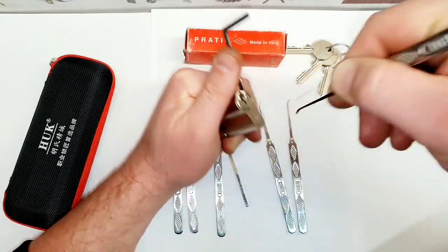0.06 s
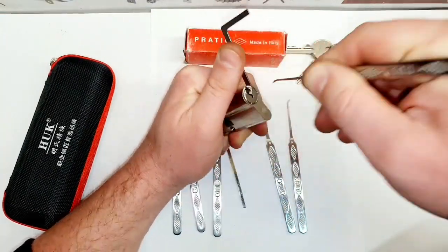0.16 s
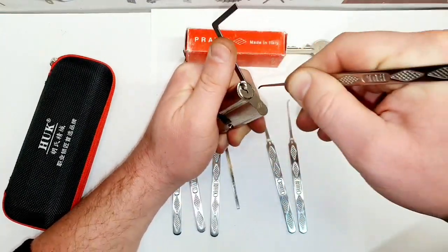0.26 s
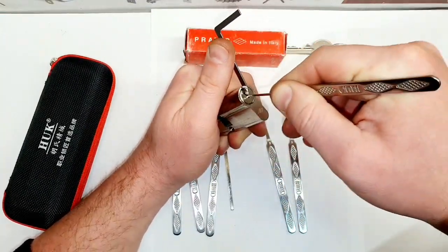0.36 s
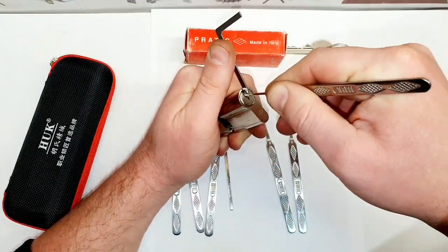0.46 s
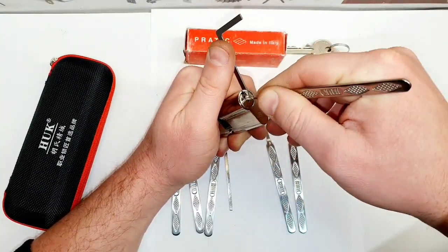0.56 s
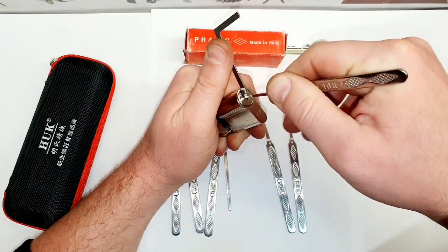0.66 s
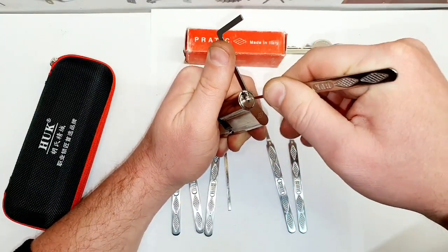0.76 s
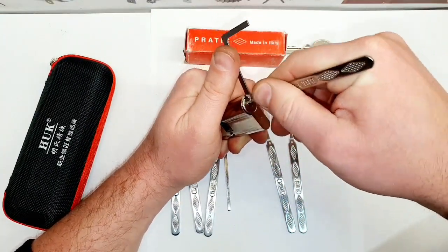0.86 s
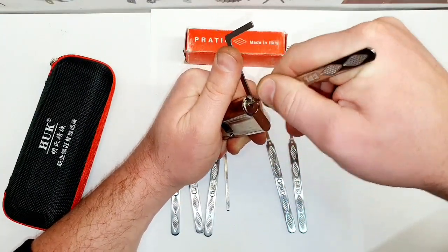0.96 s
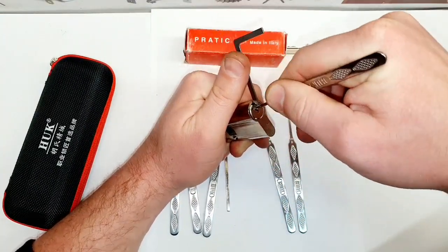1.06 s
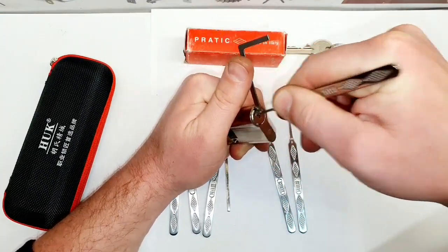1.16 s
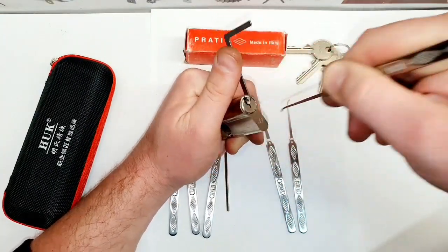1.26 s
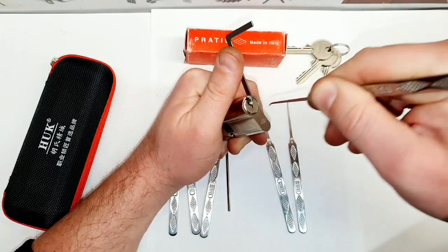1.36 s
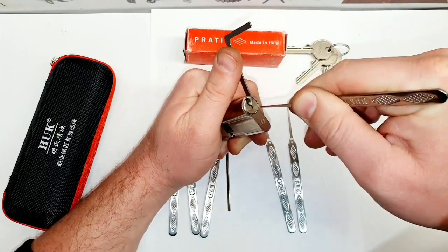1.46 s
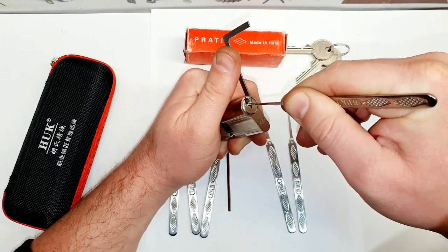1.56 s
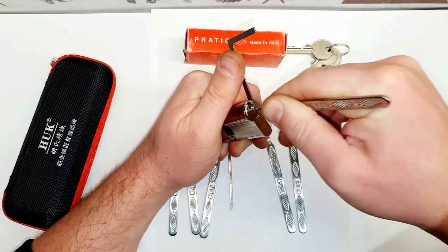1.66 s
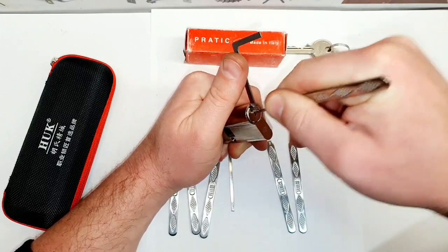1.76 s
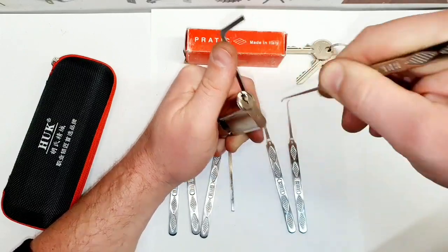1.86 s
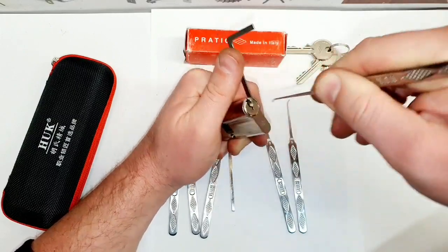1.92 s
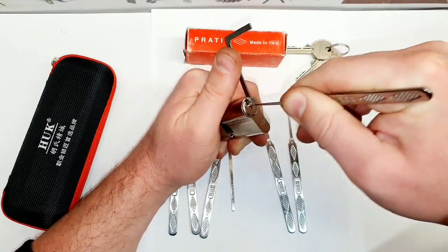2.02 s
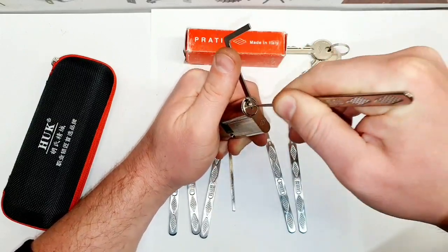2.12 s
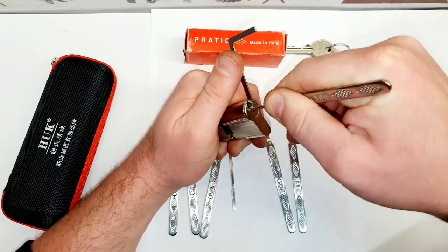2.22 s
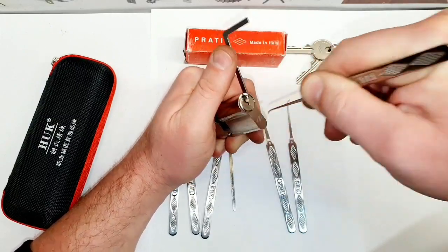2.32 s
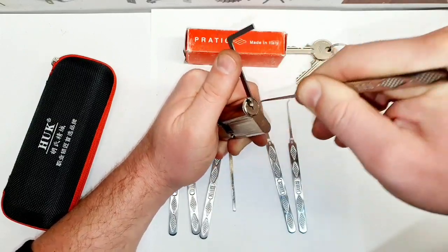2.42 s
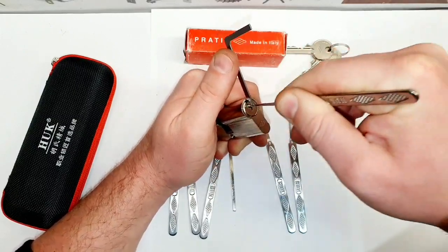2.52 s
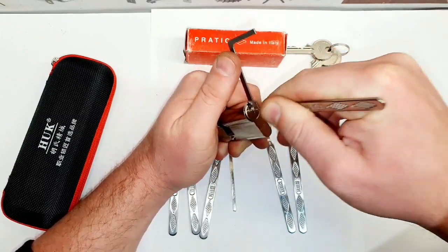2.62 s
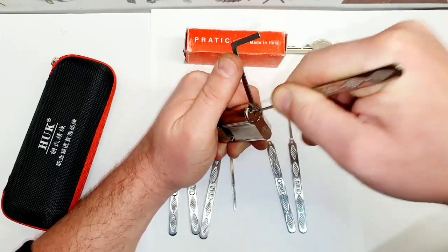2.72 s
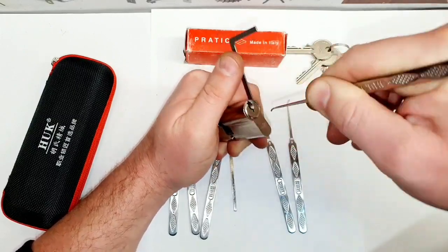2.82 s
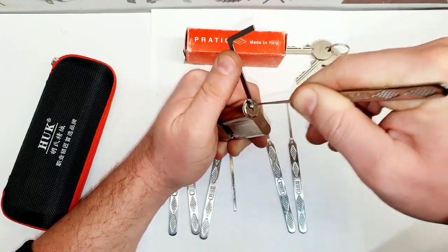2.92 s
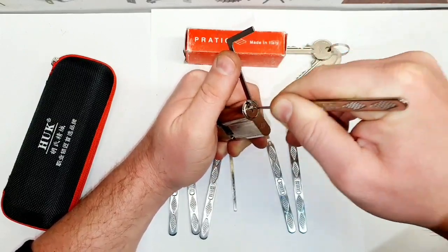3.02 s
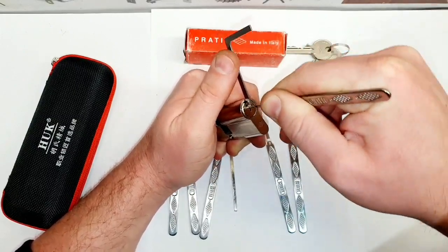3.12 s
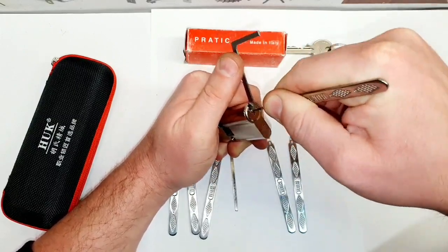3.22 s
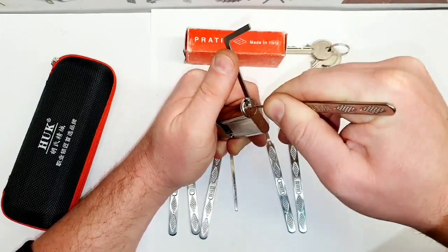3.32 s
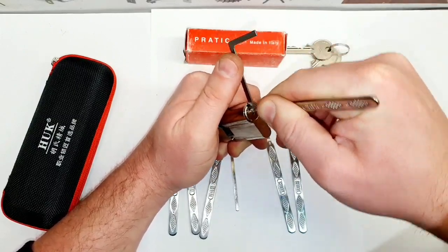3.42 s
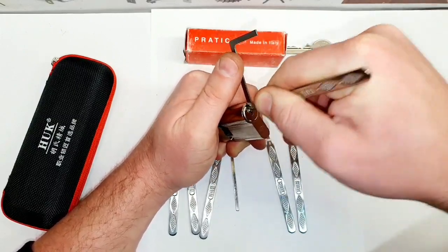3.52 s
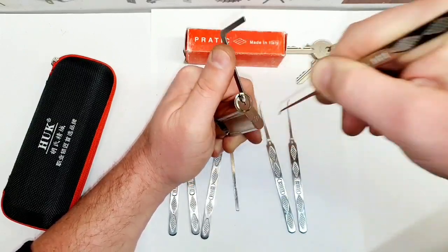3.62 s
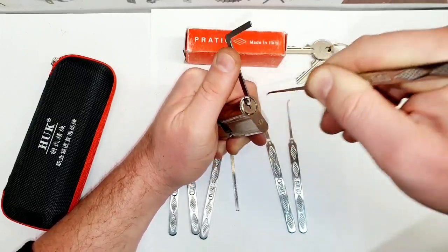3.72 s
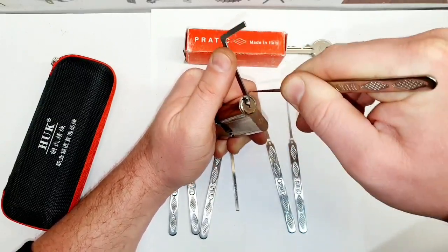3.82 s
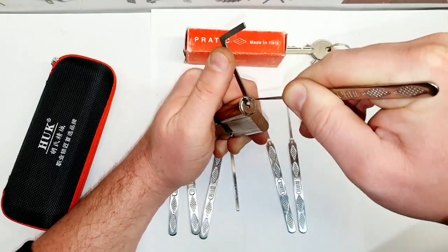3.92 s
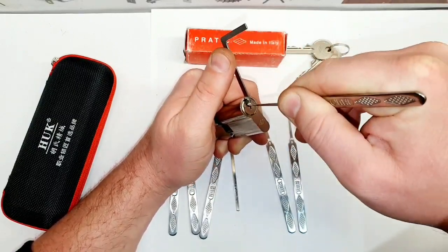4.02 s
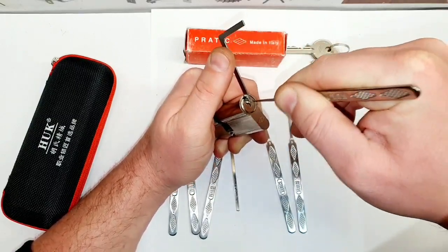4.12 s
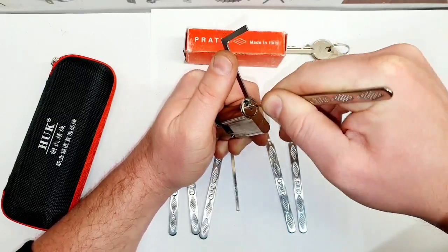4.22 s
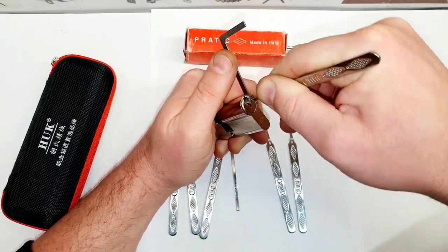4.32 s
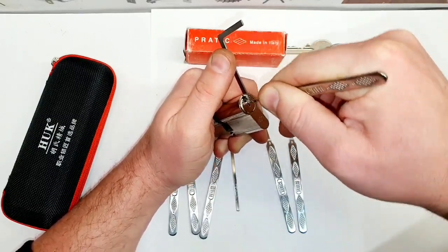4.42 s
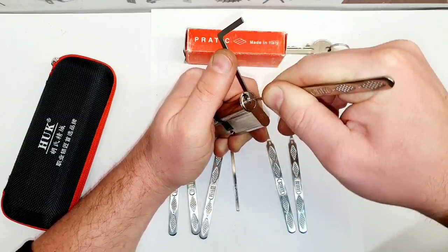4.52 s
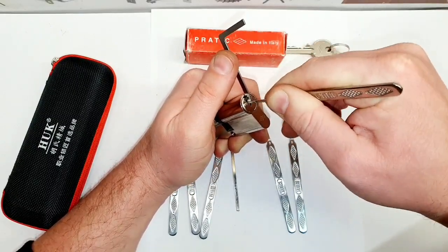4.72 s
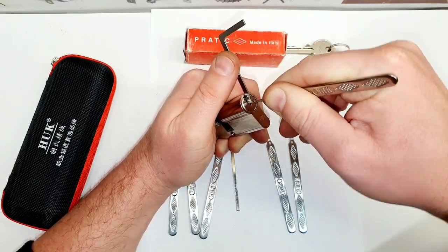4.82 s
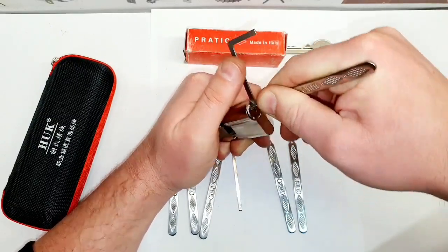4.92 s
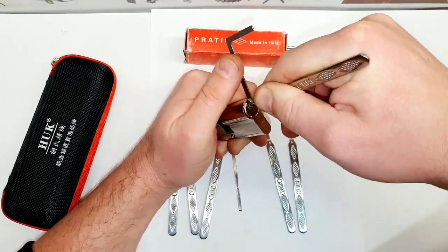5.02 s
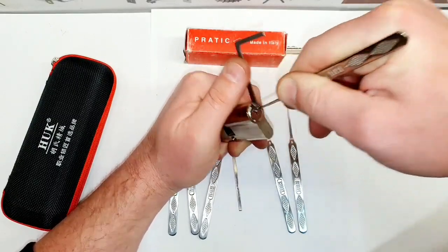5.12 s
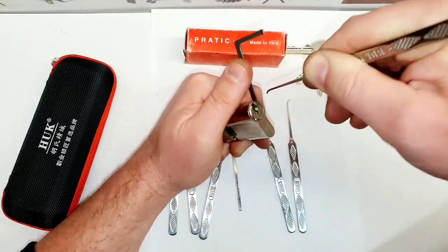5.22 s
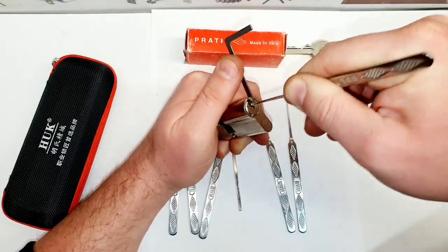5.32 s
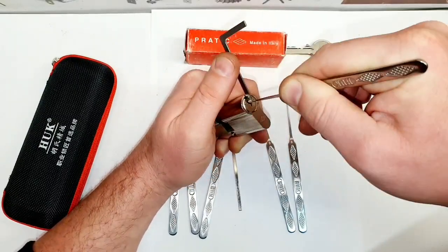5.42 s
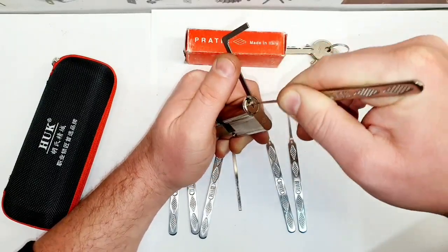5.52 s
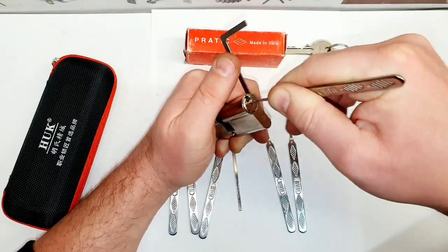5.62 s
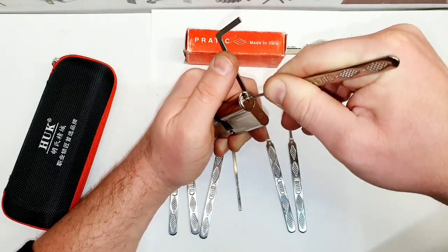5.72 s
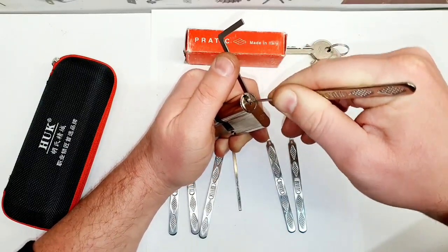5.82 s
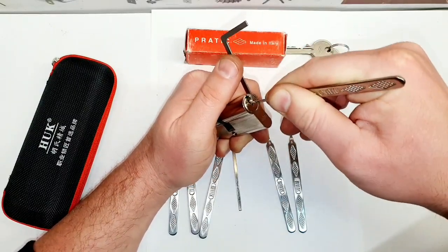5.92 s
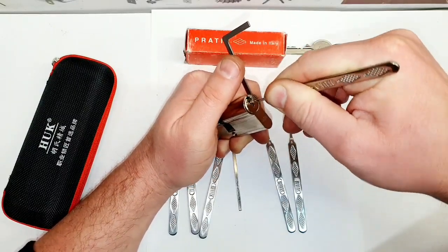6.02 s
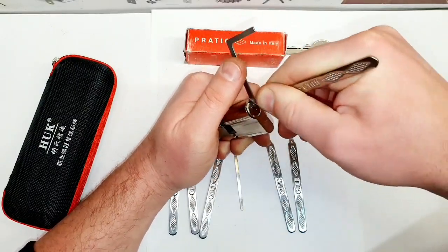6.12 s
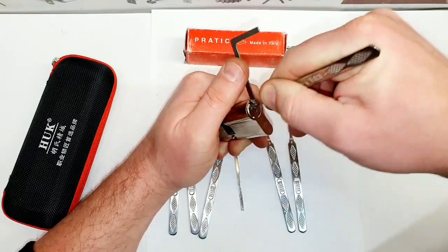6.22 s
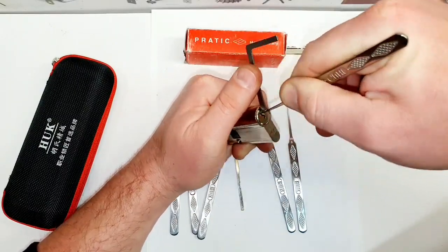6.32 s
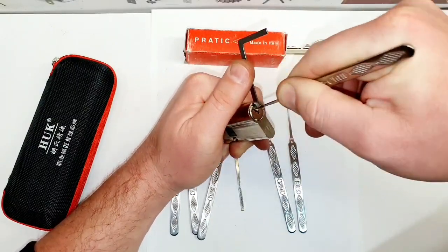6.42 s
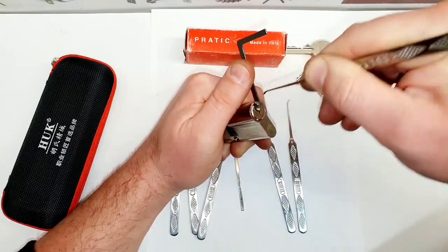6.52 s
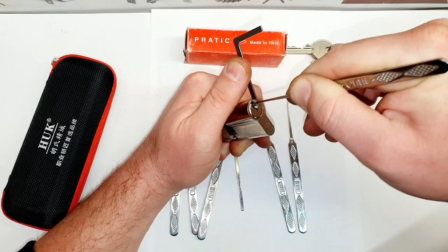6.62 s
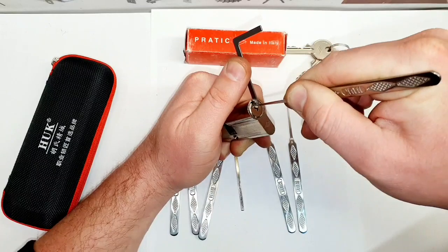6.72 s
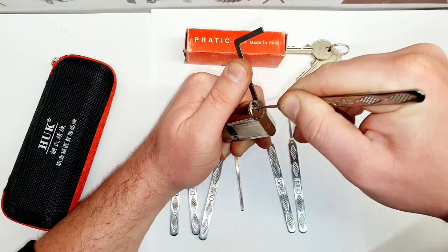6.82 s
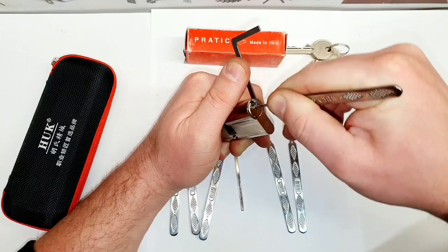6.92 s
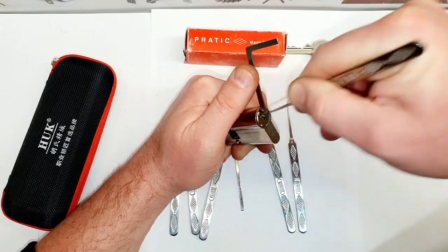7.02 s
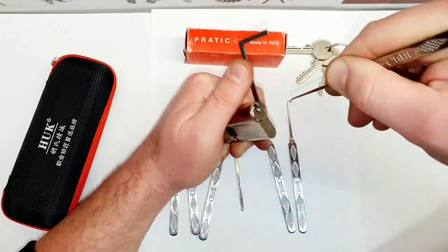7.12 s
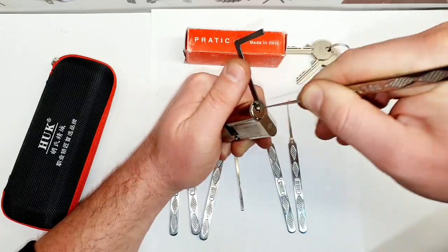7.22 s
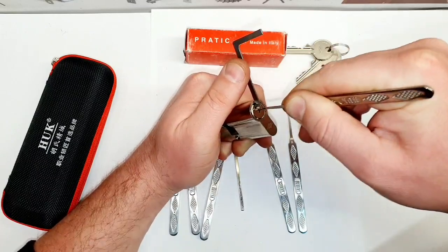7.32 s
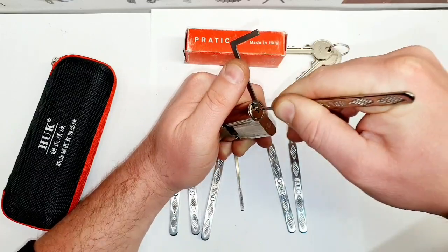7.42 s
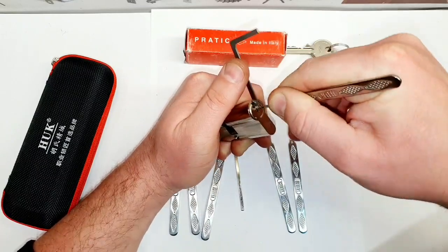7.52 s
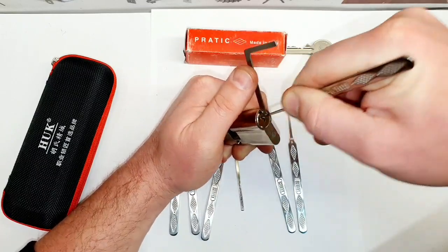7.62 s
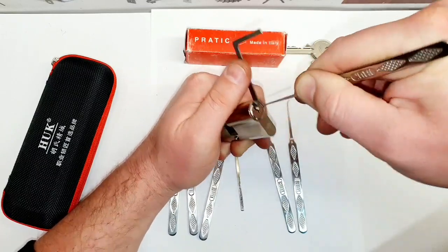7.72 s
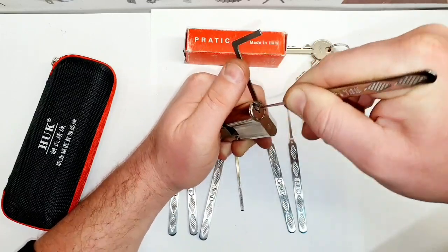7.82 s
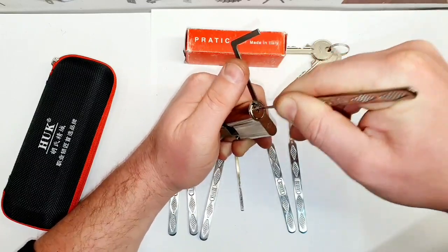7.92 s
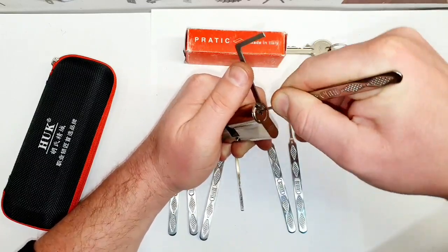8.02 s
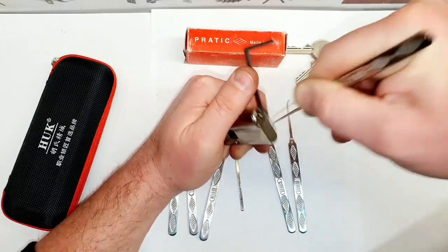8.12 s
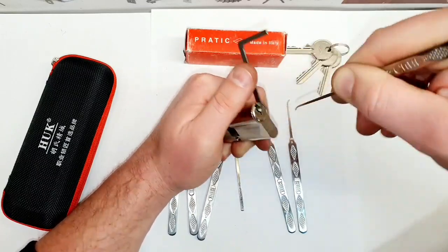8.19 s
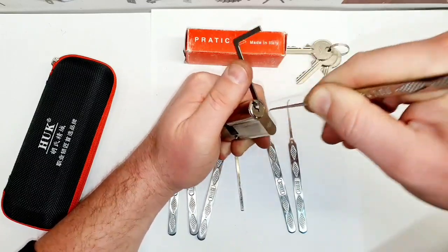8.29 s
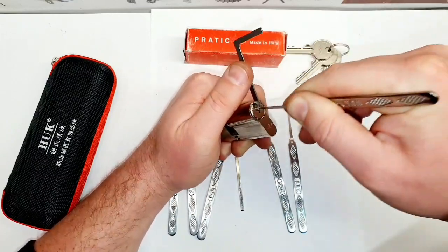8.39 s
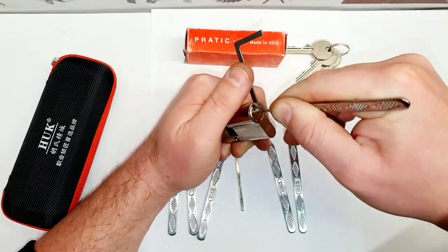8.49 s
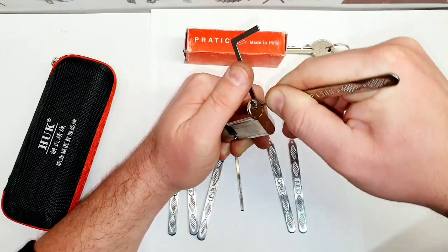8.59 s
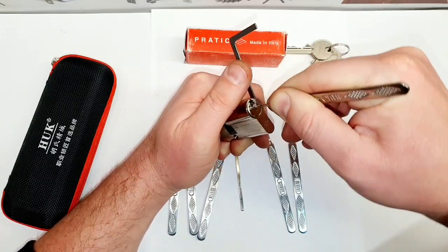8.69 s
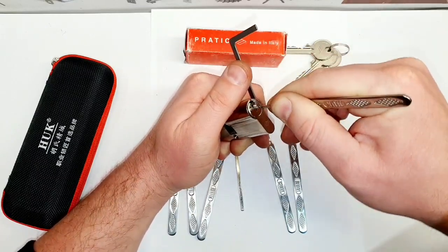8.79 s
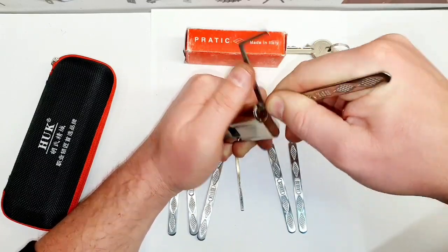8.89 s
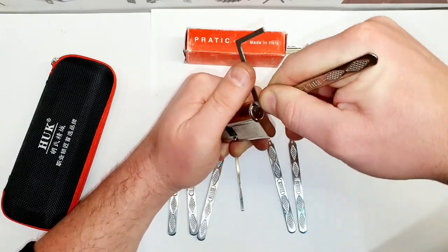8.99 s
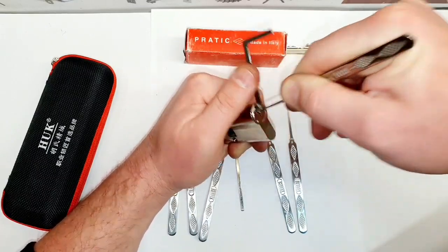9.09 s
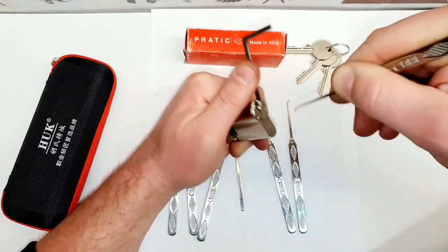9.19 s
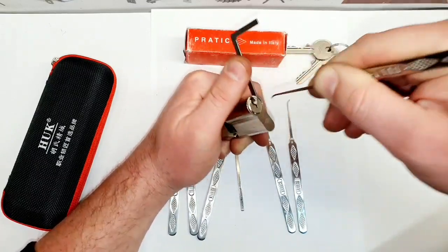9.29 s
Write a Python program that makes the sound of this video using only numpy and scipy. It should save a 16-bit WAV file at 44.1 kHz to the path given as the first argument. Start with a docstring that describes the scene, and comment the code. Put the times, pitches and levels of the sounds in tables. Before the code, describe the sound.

A steel tip feels along pins inside a small lock and snaps off them again and again. Loud bright ticks come every half second to a second, separated by faint scratches. The busy start gives way to a quieter middle, then stronger clicks and heavier knocks after five seconds. Close microphone, quiet room, low rumble swelling with each pull, steady faint hiss.

```python
"""A steel pick works the pins of a small hand-held cylinder lock, close to the microphone in a quiet, rumbling room.
Again and again the tip feels along the pins (trains of tiny slips) and snaps off them in clicks (impact noise through
steel resonances, with body modes of the lock). It is then drawn out over them: the hum and low noise swell as the hand
pulls, and fade just after the pick comes free with a twang on one damped note. A dull knock or hollow ring (decaying
noise through broad resonances) often follows. At moments fingers rub the lock (low noise); hum and hiss last throughout."""
import sys
import numpy as np
from scipy import signal
from scipy.fft import rfft, irfft
from scipy.io import wavfile
from scipy.ndimage import uniform_filter1d

SR = 44100
rng = np.random.default_rng(int(sys.argv[2]) if len(sys.argv) > 2 else 0)


def int16_out(signal):
    """Quantize to a 16-bit WAV file."""
    q = np.round(np.clip(np.atleast_2d(signal).T, -1, 1) * 32767)
    wavfile.write(sys.argv[1], SR, q.astype(np.int16))


N = 412335
TIME = np.arange(N) / SR  # seconds

# The tip snaps off a pin: start_s, level_db (at 3-8 kHz), top_octave_db (relative to that level)
PIN_SNAPS = [(0.0161, -39.5, -7), (0.0516, -37, 2), (0.066, -32, 3), (0.898, -49, -3), (0.9804, -64, 8),
             (1.0337, -37, 7.5), (1.2489, -32.5, 4), (1.2786, -35.5, 6.5), (1.284, -34, 3.5),
             (1.576, -49, 3.5), (1.7227, -48.5, -3), (1.8296, -40, 5.5), (1.8409, -40.5, 5),
             (1.8751, -29, 2), (1.9538, -41.5, -2), (2.3184, -53, 3.5), (2.376, -35.5, 1.5),
             (2.4474, -44, -3.5), (2.532, -47.5, -10), (2.6714, -47, -7), (2.707, -49, -3.5),
             (2.783, -37.5, 1.5), (2.794, -35.5, -6), (2.8082, -42, 5), (2.8226, -27, 2.5),
             (2.8926, -41.5, 0.5), (3.35, -49, 4.5), (3.5193, -42.5, -0.5), (3.6186, -37.5, 3),
             (3.658, -36.5, 2), (3.722, -39.5, -4.5), (3.8621, -45.5, -12), (3.9211, -55.5, 0),
             (4.1771, -48.5, -2), (4.3009, -56, -12.5), (4.455, -64, -6), (4.791, -60, -5.5),
             (4.959, -42.5, 8), (4.9682, -39.5, -1.5), (5.146, -44.5, 2), (5.1604, -43, 0),
             (5.171, -41.5, 3), (5.1947, -34.5, 2.5), (5.2108, -30, -2.5), (5.2299, -37, -2.5),
             (5.2862, -39, -4.5), (5.56, -47.5, 1.5), (5.6333, -48.5, -3), (5.6693, -49, -5),
             (5.692, -45, -8), (5.8296, -59.5, 0.5), (6.131, -52, 9.5), (6.1465, -34, 1.5),
             (6.3118, -45, 1.5), (6.3268, -36.5, -2.5), (6.3394, -38.5, -2), (6.3668, -26, 2),
             (6.508, -44, 5), (7.039, -51, 1), (7.0671, -29, 0), (7.1057, -25.5, -3.5), (7.118, -30, 3),
             (7.2026, -40, -5), (7.596, -55.5, 3), (7.6469, -36, 8.5), (7.6624, -34.5, 0),
             (7.692, -28, 0.5), (7.7274, -31.5, -1.5), (8.0154, -46, -4.5), (8.1274, -31.5, 0.5),
             (8.1422, -39, 4), (8.1768, -23.5, -5), (8.192, -26, -3.5), (8.1963, -24, -1),
             (8.2817, -37, -10), (8.4206, -47, -6), (8.568, -53, -2), (8.9659, -34, -1.5), (9.0694, -38, 1),
             (9.1155, -38.5, -3), (9.1387, -27.5, 8), (9.1725, -25, 2)]
# The pick is drawn out: free_s (moment it comes free), drag_length_s, drag_db, twang_db, low_swell_db
PULLS = [(0.08, 0.026, -47.5, -35.5, -48), (1.3009, 0.025, -42, -28, -38), (1.875, 0.04, -37, -24.5, -47.5),
         (2.377, 0.021, -45, -32, -42), (2.822, 0.031, -43, -24, -57), (3.665, 0.045, -37, -27, -40.5),
         (5.2116, 0.07, -48, -21.5, -40), (6.368, 0.063, -50.5, -48.5, -40.5), (7.126, 0.05, -46, -29, -52),
         (7.735, 0.093, -60, -35, -41), (8.2, 0.03, -45.5, -28, -40), (9.175, 0.071, -44.5, -21.5, -44)]
# The tip feels its way along the pins: start_s, length_s, level_db
PROBES = [(0.13, 0.095, -70), (0.44, 0.093, -64.5), (0.85, 0.25, -62.5), (1.38, 0.01, -57.5),
          (1.505, 0.19, -57), (2.06, 0.24, -65), (2.33, 0.17, -59), (2.58, 0.3, -63), (3.0, 0.12, -62),
          (3.22, 0.097, -63), (3.38, 0.15, -64.5), (3.8, 0.15, -61), (3.97, 0.092, -70.5),
          (5.29, 0.11, -67.5), (5.6, 0.082, -60.5), (5.96, 0.099, -67.5), (6.96, 0.02, -49.5),
          (7.16, 0.058, -47.5), (7.35, 0.17, -69.5), (7.81, 0.28, -66), (8.42, 0.12, -67.5),
          (9.22, 0.11, -53.5)]
# Dull knocks: start_s, level_db
KNOCKS = [(0.08, -33), (0.122, -49), (1.912, -31.5), (3.7212, -45), (5.252, -23), (8.2293, -24),
          (9.2043, -25.5)]
# The lock is jerked against the fingers: start_s, level_db
THUDS = [(1.246, -40), (1.844, -45.5), (3.619, -39.5), (4.954, -49), (6.368, -43), (7.068, -41.5),
         (7.108, -39), (7.661, -38), (8.131, -40.5), (8.18, -41)]
# Hollow rings as the parts settle: start_s, level_db
SETTLES = [(0.08, -42), (1.958, -41.5), (2.902, -48.5), (3.736, -42.5), (5.290, -38.5), (5.384, -60),
           (5.85, -65), (6.400, -50), (7.186, -43), (7.206, -39.5), (8.264, -42.5), (8.288, -43.5),
           (9.288, -43.5)]
# The flat of the pick brushes the keyway: start_s, level_db
KEYWAY_RUBS = [(0.522, -75.5), (0.646, -73), (0.861, -62), (1.383, -62), (2.458, -53), (3.134, -63),
               (3.811, -57), (3.91, -54.5), (4.455, -66.5), (5.83, -57.5), (5.966, -61.5), (6.386, -50),
               (6.98, -56)]
# The gripping fingers shift on the lock: start_s, length_s, level_db
GRIP_SHIFTS = [(0.26, 0.075, -54.5), (1.02, 0.1, -54), (3.0, 0.148, -46), (3.14, 0.13, -64)]
# Level of the low rumble over time: time_s, level_db
RUMBLE_LEVEL = [(0, -40.5), (0.3, -50.5), (0.9, -52.5), (1.6, -48), (2.1, -49.5), (3.04, -48.5),
                (3.13, -38), (3.25, -40), (3.37, -47.5), (4.7, -55.5), (5.7, -51.5), (6.7, -56.5),
                (7.15, -49), (7.55, -60), (8.3, -47.5), (8.9, -53), (9.35, -48.5)]

# Resonances of the hand-held lock: pitch_hz, level_db, t60_s
BODY_MODES = [(165, -16, 0.019), (243.3, -5.5, 0.069), (516, -8.5, 0.055), (714, -19.5, 0.05),
              (1480, -15.5, 0.01), (1605, -7.5, 0.051), (2540, -17, 0.056)]
# Spectrum of the ringing steel: frequency_hz, density_db (per Hz, relative)
STEEL_SPECTRUM = [(150, -33.5), (400, -2), (750, -8), (1300, -3.5), (2000, -1), (2800, -2), (3500, 1.5),
                  (4300, 3.5), (5800, 0.5), (7000, -0.5), (8600, -8.5), (10000, -3.5), (12200, -0.5),
                  (15600, -4)]
# Spectrum of the scraping tip: frequency_hz, density_db (per Hz, relative)
FRICTION_SPECTRUM = [(400, -0.5), (700, -7.5), (1000, -6.5), (2000, -5), (3600, -6), (5000, -6),
                     (6800, -5.5), (8500, -17), (12500, -9), (16000, -9.5)]
# Spectrum of a dull knock: frequency_hz, density_db (per Hz, relative)
KNOCK_SPECTRUM = [(120, -16.5), (240, -1.5), (350, 1), (520, 2.5), (700, -6), (1350, 4.5), (2200, -4.5),
                  (3700, -11), (6000, -12), (9000, -41), (13000, -23), (16000, -49.5)]
# Hollow resonances of the settling parts: frequency_hz, density_db (per Hz, relative)
HOLLOW_SPECTRUM = [(300, -13), (520, -8), (680, -11.5), (820, 9), (930, 4), (1100, -14.5), (2250, -9),
                   (2650, 1.5), (3000, -8.5), (5000, -19.5), (16000, -30)]
# Spectrum of fingers rubbing the lock: frequency_hz, density_db (per Hz, relative)
SKIN_SPECTRUM = [(40, 6.5), (180, 3.5), (320, -6), (480, -14.5), (1500, -47.5)]
# Spectrum of the low room noise: frequency_hz, density_db (per Hz, relative)
RUMBLE_SPECTRUM = [(20, -23), (50, -10.5), (62, -0.5), (68, 1.5), (78, -7.5), (110, -14), (145, -23.5),
                   (195, -17), (330, -33), (2000, -74.5)]
# Spectrum of the steady hiss: frequency_hz, density_db (per Hz, relative)
HISS_SPECTRUM = [(100, -0.5), (500, 0), (900, -11.5), (1700, -2.5), (3000, -18), (6500, -21.5), (8500, -26),
                 (13000, -19), (16000, -24)]
# Reverberation time of the room: frequency_hz, t60_s
ROOM_T60 = [(200, 0.83), (1000, 0.32), (4000, 0.28), (9000, 0.12), (16000, 0.53)]

# Shares in a click of middling level, and their change per dB of level: faint clicks are duller and start more softly
MIDDLING_DB = -43
BODY_SHARE_DB, BODY_SHARE_SLOPE = -8.5, -0.32
LEAD_IN_SHARE_DB, LEAD_IN_SHARE_SLOPE, LEAD_IN_S = -10, -0.57, 0.0012
# Friction: slips per second, decay of each slip, level of the tip lying in the keyway
SLIPS_PER_S, SLIP_S, RESTING_DB = 90, 0.0035, -82
# Rates of rise and fall of each stroke, in dB per second
PROBE_RISE_DB_PER_S, PROBE_FALL_DB_PER_S = 891.5, 351
DRAG_RISE_DB_PER_S, DRAG_FALL_DB_PER_S = 1100, 518.5
SWELL_RISE_DB_PER_S, SWELL_FALL_DB_PER_S = 250, 250
GRIP_RISE_DB_PER_S, GRIP_FALL_DB_PER_S = 1500.5, 700
HISS_DB = -77.5
CUTOFF_HZ = 16000


def pin_clicks(patchy_db=2.5, count=44, size=1024):
    """Impact excitation: a very short noise swell leads into each click of varied steel colour; the lock jolts."""
    out = np.zeros((2, N))
    hz = np.fft.rfftfreq(size, 1 / SR)
    top = np.interp(hz, [7000, 9500], [0, 1])
    low = np.interp(hz, [1900, 3300], [1, 0])
    patch_hz = np.geomspace(400, 16000, count)
    lead = size // 2
    swell = np.exp(-TIME[:lead] / LEAD_IN_S)[::-1]
    for s, db, top_db in PIN_SNAPS:
        strength_db = db - MIDDLING_DB
        body_tilt_db = BODY_SHARE_SLOPE * strength_db
        lead_in_db = LEAD_IN_SHARE_DB + LEAD_IN_SHARE_SLOPE * strength_db
        # each snap has its own random peaks and dips
        patches = np.interp(hz, patch_hz, rng.standard_normal(count))
        steel_db = at_hz(STEEL_SPECTRUM, hz) + top * top_db + low * body_tilt_db + patchy_db * patches
        burst = contact(crack_db=-10.5, rattle_db=-6.0, rattle_s=0.00031, ring_s=0.0049, side_db=0.0,
                        table_db=-16.5)
        lead_in = from_db(lead_in_db) * swell * rng.standard_normal((2, lead))
        click = convolve(np.hstack([lead_in, burst]), response(steel_db))
        add(out, s - lead / SR, from_db(db + 6.5) * click)
        jolt = struck(BODY_MODES, spread_db=2.5, detune=0.0092)
        add(out, s, from_db(db + BODY_SHARE_DB + body_tilt_db + 8.0) * jolt)
    return out


def contact(crack_db, rattle_db, rattle_s, ring_s, side_db, table_db, table_s=0.0047, size=2200):
    """Impact and reflection: a hard crack, a short rattle and a dense metal ring, echoed by the table."""
    t = TIME[:size]
    decay = from_db(rattle_db) * np.exp(-t / rattle_s) + np.exp(-t / ring_s)
    burst = unit_energy(decay * two_ears(size, side_db))
    # the crack reaches the right microphone one sample before the left
    burst[[0, 1], [1, 0]] += from_db(crack_db) * rng.choice([-1, 1])
    lag = int(table_s * SR * rng.uniform(.9, 0.91))
    echo = np.pad(burst, [(0, 0), (lag, 0)])[:, :size]
    burst = burst + from_db(table_db) * echo
    return unit_energy(burst) * np.sqrt(SR / 200)  # the energy of 5 ms at rms 1


def struck(modes, spread_db, detune, size=6000):
    """Modal synthesis: one blow sums damped sines, each with random strength and slight mistuning."""
    hz, db, t60 = np.transpose(modes)[:, :, None]
    t = TIME[:size]
    strength, shift = rng.standard_normal((2, len(modes), 1))
    decay = from_db(db + spread_db * strength - 60 * t / t60)
    return np.sum(decay * np.sin(2 * np.pi * hz * (1 + detune * shift) * t), axis=0)


def scraping(spread_db=4.0, smooth_db=-12.0, patchy_db=2.5, focus_db_per_octave=9.0, centre_hz=5200,
             centre_octaves=0.9, count=15):
    """Stick-slip friction: random tiny slips, each briefly exciting bands round its own centre, over smooth noise."""
    at = np.flatnonzero(rng.random(N) < SLIPS_PER_S / SR)
    sizes_db = spread_db * np.minimum(rng.exponential(1, len(at)), 2)
    centres = np.log2(centre_hz) + centre_octaves * rng.standard_normal(len(at))
    white = rng.standard_normal((2, 2, N))  # neighbouring bands get unrelated noise
    slip_decay = np.exp(-1 / (SLIP_S * SR))
    grain, edges = 0, np.geomspace(500, 17000, count)
    for k, (low, high) in enumerate(zip(edges, edges[1:])):
        off_centre = np.minimum(np.abs(np.log2(low * high) / 2 - centres), 2)  # octaves
        patches_db = patchy_db * rng.uniform(-1.6, 1.6, len(at))
        slips = np.zeros(N)
        slips[at] = from_db(sizes_db - focus_db_per_octave * off_centre + patches_db)
        activity = signal.lfilter([1], [1, -slip_decay], slips + 1e-18)
        level = rms_one(activity) + from_db(smooth_db)
        grain = grain + cut(level * white[k % 2], [low, high], "band")
    return colour(rms_one(grain) * pressure(), FRICTION_SPECTRUM)


def pressure():
    """Friction grows with contact force: its gain follows the resting, probing and drawn-out tip."""
    probing = strokes(PROBES, PROBE_RISE_DB_PER_S, PROBE_FALL_DB_PER_S)
    drags = [(s - length, length, db) for s, length, db, _, _ in PULLS]
    dragging = strokes(drags, DRAG_RISE_DB_PER_S, DRAG_FALL_DB_PER_S)
    return from_db(RESTING_DB) + probing + dragging


def twangs(pitch_hz=1578, hold_s=0.011, thump_db=-18.0, thump_hz=66, thump_s=0.057, size=6000):
    """Damped free vibration: the shank rings on one note until the fingers choke it, with a soft low thump."""
    out, t = np.zeros((2, N)), TIME[:size]
    note = np.exp(-(t / hold_s) ** 2) * np.sin(2 * np.pi * pitch_hz * t)
    thump = from_db(thump_db) * np.exp(-t / thump_s) * np.sin(2 * np.pi * thump_hz * t)
    for s, _, _, db, _ in PULLS:
        add(out, s, from_db(db) * (note + thump))
    return out


def knocks(body_db=-10.5):
    """Soft impact: a heavier contact excites little treble and shakes the modes of the whole lock."""
    out, body = np.zeros((2, 2, N))
    for s, db in KNOCKS:
        blow = contact(crack_db=-18.0, rattle_db=9.0, rattle_s=0.00054, ring_s=0.012, side_db=-5.5,
                       table_db=-17.0)
        add(out, s, from_db(db) * blow)
        add(body, s, from_db(db + body_db) * struck(BODY_MODES, spread_db=2.5, detune=0))
    return colour(out, KNOCK_SPECTRUM) + body


def thuds(pitch_hz=240, rise_s=0.002, fall_s=0.012, detune=0.095, size=5000):
    """Mass on a lossy spring: the lock bounces on the flesh of the hand for a few damped low cycles."""
    out, t = np.zeros((2, N)), TIME[:size]
    envelope = np.exp(-t / fall_s) - np.exp(-t / rise_s)
    for (s, db), shift in zip(THUDS, rng.standard_normal(len(THUDS))):
        bounce = np.sin(2 * np.pi * pitch_hz * (1 + detune * shift) * t)
        add(out, s, from_db(db + 9.5) * envelope * bounce)
    return out


def settles(rattle_s=0.014, rise_s=0.0013, size=5000):
    """Resonant filtering: a brief noisy rattle sounds through hollow resonances near 850 and 2650 Hz."""
    out, t = np.zeros((2, N)), TIME[:size]
    envelope = np.exp(-t / rattle_s) - np.exp(-t / rise_s)
    for s, db in SETTLES:
        add(out, s, from_db(db + 3.5) * envelope * two_ears(size, side_db=-2.0))
    return colour(out, HOLLOW_SPECTRUM)


def hollow_tail(x, tail_db=-22.5, tail_s=0.033, rise_s=0.0068, size=12000):
    """Resonance by convolution: every contact leaves a faint lingering ring in the same hollow resonances."""
    t = TIME[:size]
    envelope = np.exp(-t / tail_s) - np.exp(-t / rise_s)
    ring = unit_energy(envelope * two_ears(size, side_db=-1.5))
    return from_db(tail_db) * colour(convolve(x, ring), HOLLOW_SPECTRUM)


def rubs(length_s=0.0157, band_hz=(2500, 4300), size=8000):
    """Sliding friction: the flat of the pick brushes the keyway in a short swell of band-limited noise."""
    out, t = np.zeros((2, N)), TIME[:size]
    swell = t / length_s * np.exp(1 - t / length_s)  # peaks at length_s
    for s, db in KEYWAY_RUBS:
        add(out, s, from_db(db + 8.5) * swell * rng.standard_normal((2, size)))
    return cut(out, band_hz, "band")


def grip():
    """Skin friction: fingers shifting on the lock body make strokes of low noise."""
    level = strokes(GRIP_SHIFTS, GRIP_RISE_DB_PER_S, GRIP_FALL_DB_PER_S)
    return level * stereo_noise(SKIN_SPECTRUM, side_db=-13.5)


def room(x, early_db=14.0, early_s=0.012, gap_s=0.0035, size=26000, count=9):
    """Reverberation: dense early reflections lead to a diffuse tail that decays band by band."""
    t, tail = TIME[:size], 0
    edges = np.geomspace(120, 17000, count)
    for low, high in zip(edges, edges[1:]):
        band = cut(rng.standard_normal((2, size)), [low, high], "band")
        t60 = at_hz(ROOM_T60, np.sqrt(low * high))
        tail = tail + band * from_db(-60 * t / t60)
    early = 1 + from_db(early_db) * np.exp(-t / early_s)
    onset = np.clip(t / gap_s - 1, 0, 1)  # silent for gap_s, then fades in over as long again
    return convolve(x, unit_energy(cut(tail * early * onset, 4600, "low", order=1)))


def rumble(hum_hz=68, hum_db=0.0, swell_s=0.033, lag_s=0.008, size=5000):
    """Amplitude modulation: hum and low noise swell as the hand pulls, and fade just after the pick comes free."""
    hum = from_db(hum_db) * np.sin(2 * np.pi * hum_hz * TIME)
    lows = stereo_noise(RUMBLE_SPECTRUM, side_db=-9.5) + hum
    # even out the level before shaping it
    evened = lows / np.sqrt(uniform_filter1d(np.mean(lows ** 2, axis=0), size))
    swells = [(s + lag_s - swell_s, swell_s, db) for s, *_, db in PULLS]
    swell = strokes(swells, SWELL_RISE_DB_PER_S, SWELL_FALL_DB_PER_S)
    return np.hypot(level_curve(RUMBLE_LEVEL), swell) * evened


def hiss():
    """Stationary noise: a faint coloured hiss of constant level."""
    return from_db(HISS_DB) * stereo_noise(HISS_SPECTRUM, side_db=-1.0)


def stereo_noise(spectrum, side_db):
    """Spectral shaping: coloured stereo noise at rms 1."""
    return rms_one(colour(two_ears(N, side_db), spectrum))


def two_ears(size, side_db):
    """Partial coherence: mid and side white noise make channels partly alike, at rms 1."""
    mid, side = rng.standard_normal((2, size))
    return rms_one(mid + from_db(side_db) * side * [[1], [-1]])


def strokes(rows, rise_db_per_s, fall_db_per_s):
    """Exponential growth and decay: the gain of rows (start_s, length_s, level_db) that rise, hold and die away."""
    t, gain = TIME[::32], 0
    for s, length, db in rows:
        before, after = np.maximum(s - t, 0), np.maximum(t - s - length, 0)
        gain = gain + from_db(db - rise_db_per_s * before - fall_db_per_s * after)
    return np.interp(TIME, t, gain)


def level_curve(rows):
    """Level interpolation: gain at every sample from rows of (time_s, level_db)."""
    return from_db(np.interp(TIME, *np.transpose(rows), left=-120, right=-120))


def colour(x, spectrum, size=8192):
    """Linear filtering: impose the given spectrum with unit power gain."""
    db = at_hz(spectrum, np.fft.rfftfreq(size, 1 / SR))
    return convolve(x, unit_energy(response(db)))


def response(db):
    """Minimum phase: causal impulse response, by folded cepstrum, from levels at evenly spaced frequencies."""
    cepstrum = irfft(np.log(from_db(db)))
    cepstrum[1:len(db) - 1] *= 2
    cepstrum[len(db):] = 0
    return irfft(np.exp(rfft(cepstrum)))


def at_hz(points, hz):
    """Logarithmic pitch scale: read a table along log frequency."""
    f, value = np.transpose(points)
    return np.interp(np.log(np.maximum(hz, 1)), np.log(f), value)


def cut(x, hz, kind, order=2):
    """Band limiting: Butterworth filter."""
    return signal.sosfilt(signal.butter(order, hz, kind, fs=SR, output="sos"), x + 1e-18)


def convolve(x, response):
    """Convolution: pass a sound through an impulse response."""
    return signal.oaconvolve(np.atleast_2d(x), np.atleast_2d(response), axes=-1)[:, :N]


def add(track, s, sound):
    """Superposition: mix a short sound into a stereo track at time s."""
    start = max(round(s * SR), 0)
    track[:, start:start + sound.shape[-1]] += sound[..., :max(N - start, 0)]


def from_db(db):
    """Logarithmic level: decibels to amplitude gain."""
    return 10 ** (np.asarray(db) / 20)


def rms_one(x):
    """Power normalisation: scale to rms 1."""
    return x / np.sqrt(np.mean(x ** 2) + 1e-20)


def unit_energy(x):
    """Energy normalisation: scale each channel to energy 1."""
    return x / np.sqrt(np.sum(x ** 2, axis=-1, keepdims=True) + 1e-20)


def scene():
    """Superposition of direct and reverberant sound: the lock sits a little right; each group has its own echo level."""
    sharp, shank = pin_clicks() + scraping(), twangs()
    dull = knocks() + thuds() + settles() + rubs() + hollow_tail(sharp)
    # pairs of gains in dB: left, right
    lock = (sharp + shank + dull) * from_db([[-2.6], [2.2]])
    sent = from_db(-12.5) * sharp + from_db(-27.5) * shank + from_db(-17.5) * dull
    echo = room(sent) * from_db([[-1.2], [1.2]])
    lows = (rumble() + grip()) * from_db([[-3.0], [2.2]])
    return lock + echo + lows + hiss()


def record(dry):
    """Band limiting: a steep elliptic low-pass removes the extreme treble."""
    return signal.sosfilt(signal.ellip(10, .1, 80, CUTOFF_HZ, fs=SR, output="sos"), dry)


dry = scene()
out = record(dry)
int16_out(out)
```